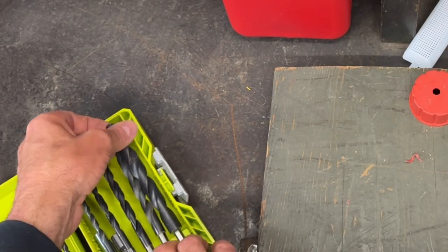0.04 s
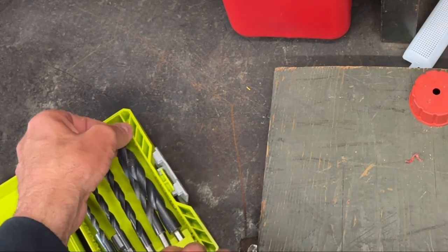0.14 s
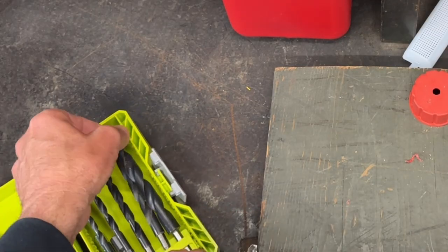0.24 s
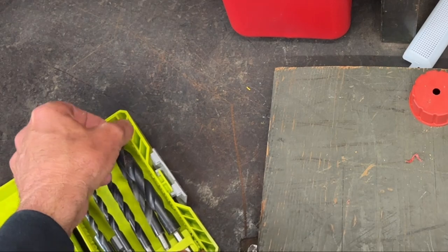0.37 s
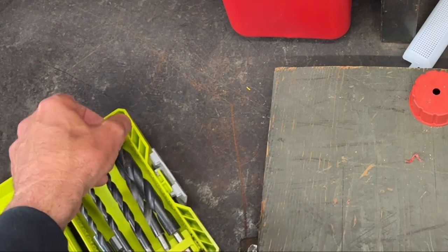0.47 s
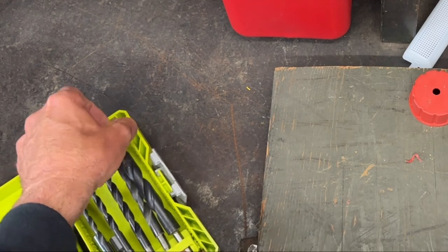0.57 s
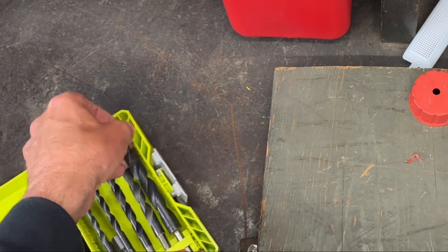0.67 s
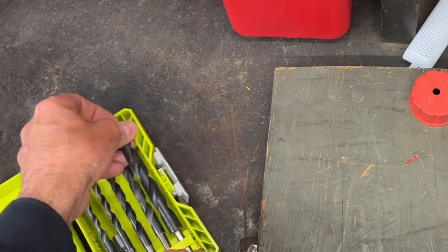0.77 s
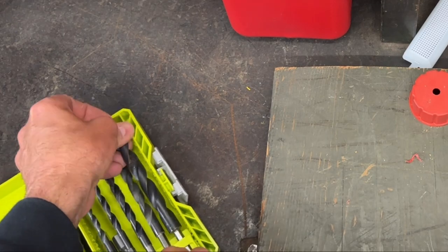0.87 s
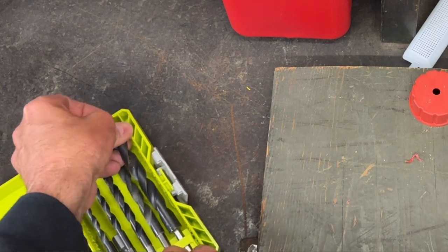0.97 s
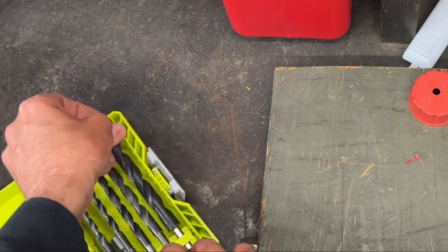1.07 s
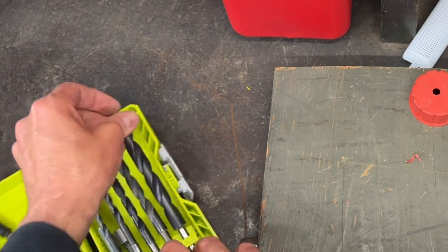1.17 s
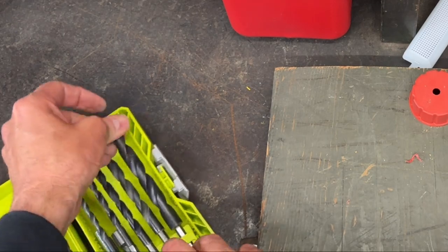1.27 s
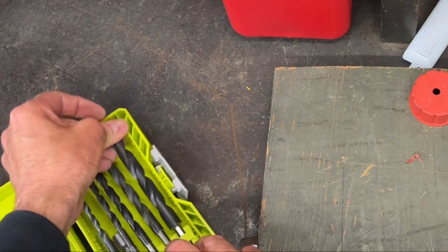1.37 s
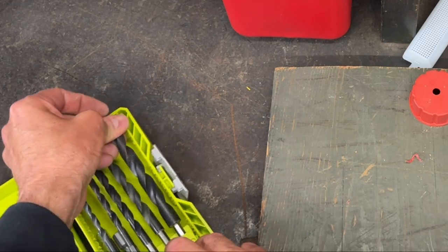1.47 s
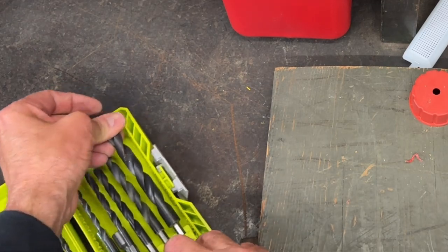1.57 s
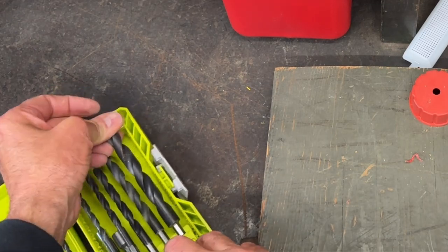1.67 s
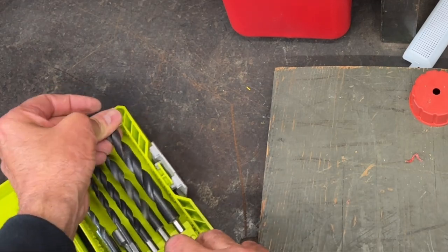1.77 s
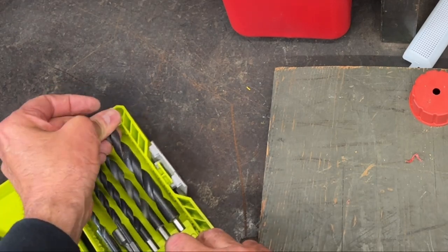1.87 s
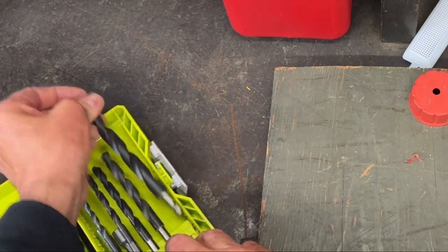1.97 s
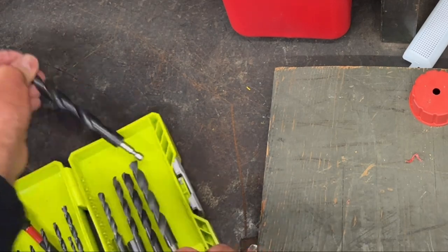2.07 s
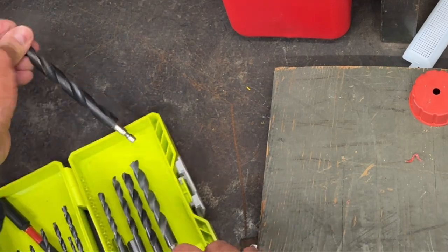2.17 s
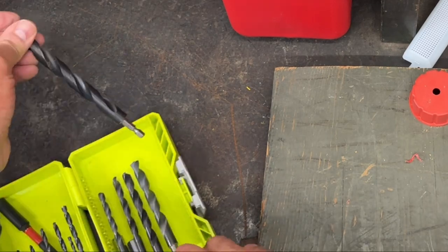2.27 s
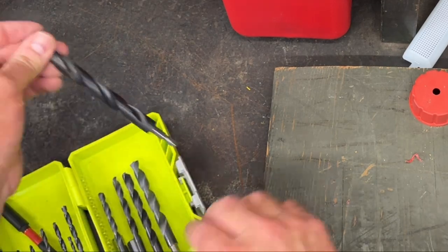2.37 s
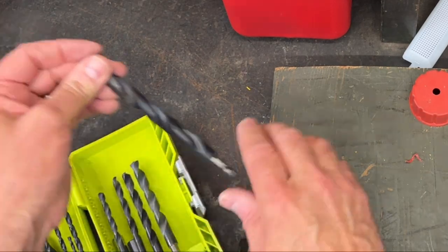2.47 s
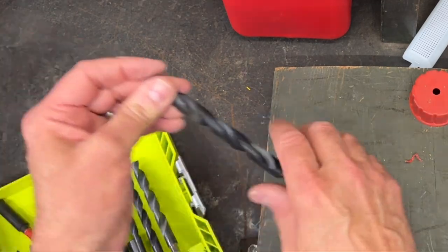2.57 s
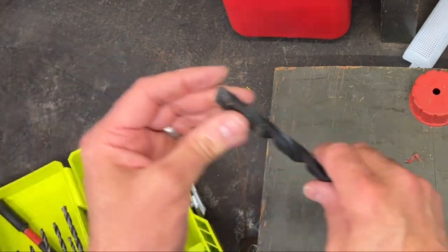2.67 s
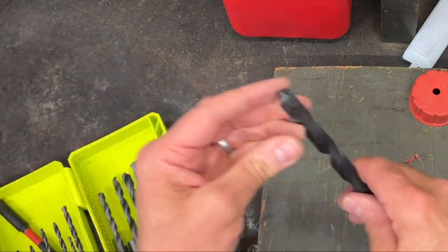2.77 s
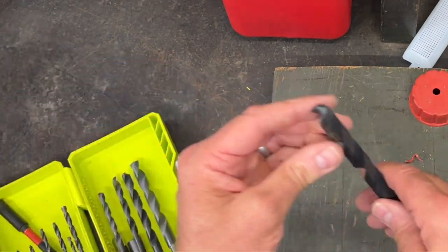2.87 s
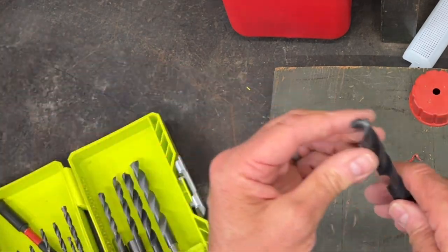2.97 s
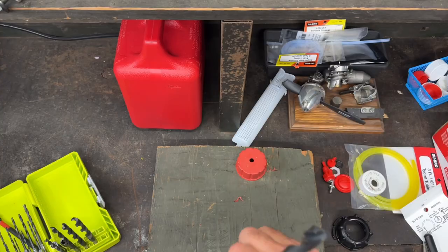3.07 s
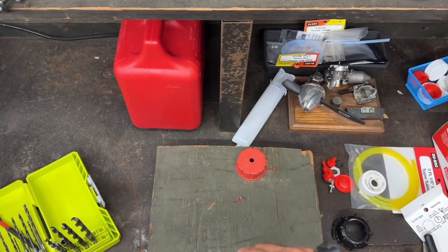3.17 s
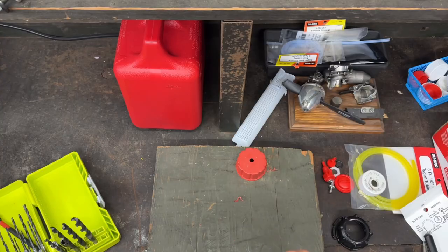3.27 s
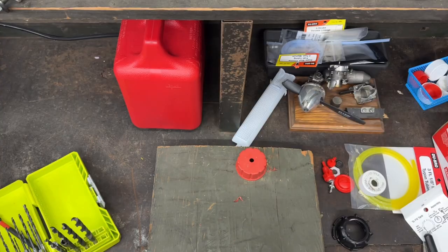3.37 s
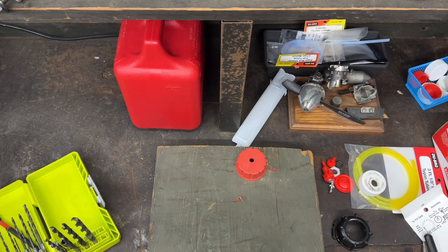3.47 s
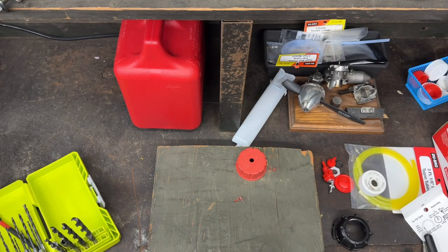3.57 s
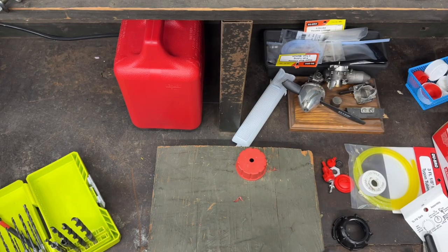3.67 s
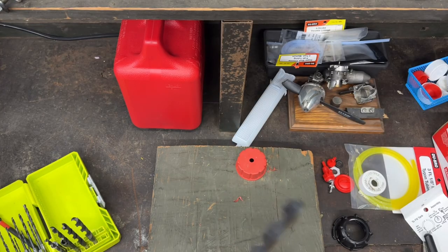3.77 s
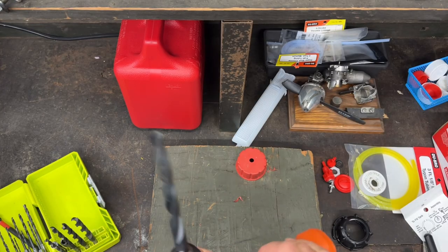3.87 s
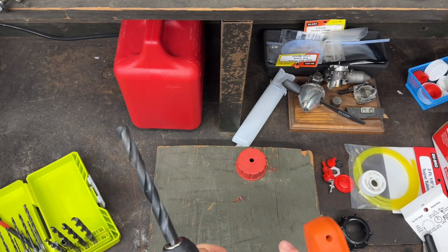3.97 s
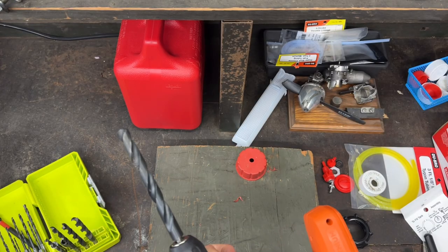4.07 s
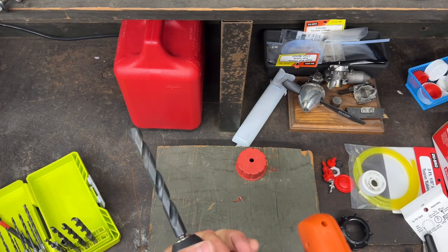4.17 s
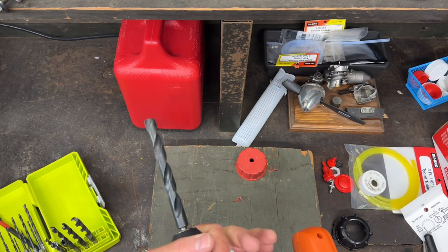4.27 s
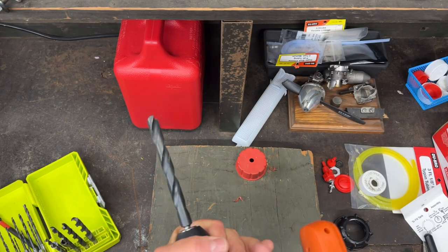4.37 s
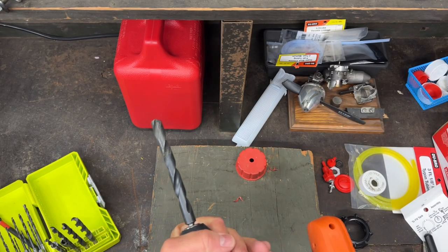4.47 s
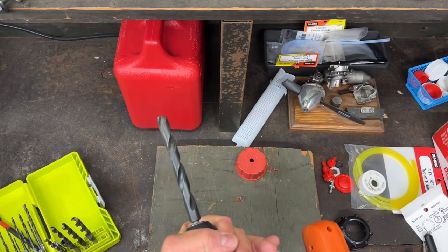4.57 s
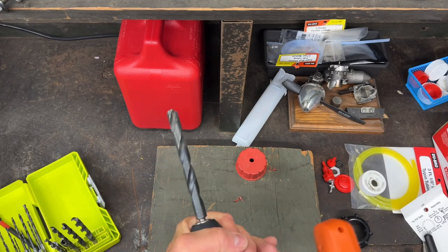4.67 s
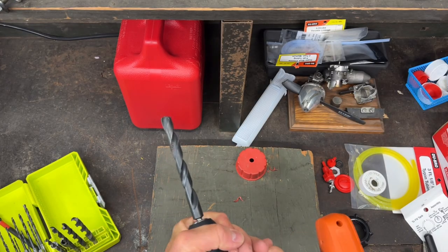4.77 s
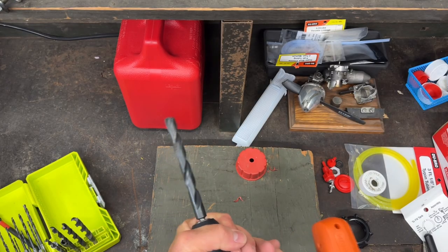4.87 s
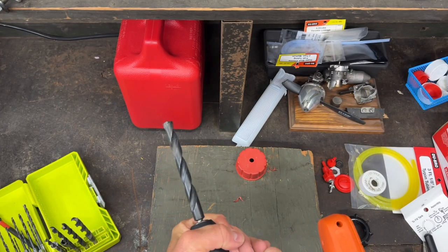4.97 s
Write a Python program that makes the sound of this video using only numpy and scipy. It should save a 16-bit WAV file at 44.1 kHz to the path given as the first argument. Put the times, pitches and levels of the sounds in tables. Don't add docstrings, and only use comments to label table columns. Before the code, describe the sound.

Skin rubs on plastic and drill bits clatter irregularly in their case, growing busier before a violent double snap releases one bit, ringing thinly. The scene cuts with a soft low bump; light handling and tiny switch clicks follow. A cordless drill then revs three times, each pull very brief, with loose gear rattle between. Close, fairly dry small-room sound with low handling rumble.

```python
import sys
import numpy as np
from scipy import signal
from scipy.fft import rfft, irfft, next_fast_len
from scipy.io import wavfile
from scipy.ndimage import uniform_filter1d

SR = 44100
rng = np.random.default_rng(int(sys.argv[2]) if len(sys.argv) > 2 else 0)


def field_ratio(decibels):
    return 10 ** (np.asarray(decibels, dtype=float) / 20)


def dump_mix(stems):
    frames = np.atleast_2d(stems).T
    limited = np.clip(frames, -1, 1)
    pcm = np.round(limited * 32767).astype(np.int16)
    wavfile.write(sys.argv[1], SR, pcm)


N = 221911
TIME = np.arange(N) / SR
CHANGE_S = 3.0435

# centre_hz, width_hz, level_db
CASE_MODES = [(428, 12, -2.5), (720, 470, 0.5), (976, 110, -8), (1160, 210, 4.5), (1380, 56, -5),
              (1950, 130, 3), (2050, 20, -4), (2260, 25, -8), (2820, 38, -11.5), (3750, 120, -6.5),
              (4446, 360, -2.5), (4860, 380, -11)]


def evened(x):
    return x / np.sqrt(np.mean(x ** 2) + 1e-20)


def read(points, hz):
    f, value = np.transpose(points)
    return np.interp(np.log(hz + 1), np.log(f + 1), value)


def colour(x, points):
    size = next_fast_len(len(x))
    gain = field_ratio(read(points, np.fft.rfftfreq(size, 1 / SR)))
    return evened(irfft(rfft(x, size) * gain, size)[:len(x)])


def band(x, lo_hz, hi_hz, order=2):
    sos = signal.butter(order, [lo_hz, min(hi_hz, 20000)], "band", fs=SR, output="sos")
    return signal.sosfilt(sos, x)


def resonate(x, hz, width_hz):
    r = np.exp(-np.pi * width_hz / SR)
    feedback = [1, -2 * r * np.cos(2 * np.pi * hz / SR), r * r]
    return signal.lfilter([(1 - r * r) / 2, 0, (r * r - 1) / 2], feedback, x)


def body(x, modes):
    return sum(field_ratio(db) * resonate(x, hz, width_hz) for hz, width_hz, db in modes)


def wander(smooth):
    return evened(uniform_filter1d(rng.standard_normal(N), smooth))


def grit(spread_db, smooth):
    return rng.standard_normal(N) * field_ratio(spread_db * wander(smooth))


def add(mix, start_s, sound):
    part = mix[round(start_s * SR):][:len(sound)]
    part += sound[:len(part)]


def background():
    # pitch_hz, level_db (per Hz)
    hush_tones = [
        [(59, -19), (100, 4.5), (279, -9), (330, -15.5), (427, -11), (540, -35.5), (920, -20.5), (1140, -23.5), (10900, -37), (15100, -37.5), (16400, -51)],
        [(59, -60.5), (100, -2.5), (345, -30.5), (776, -39), (920, -26.5), (1540, -34), (2850, -34), (4100, -43), (4660, -38), (14100, -46.5), (16400, -44.5)],
    ]
    # time_s, level_db
    hand_curve = [(0, -71), (.28, -67.5), (.5, -73.5), (.99, -67), (1.36, -64.5), (1.74, -66.5),
                  (1.93, -68), (1.942, -44.5), (2.08, -45), (2.13, -59.5), (2.52, -74.5), (3.04, -75),
                  (3.2, -87), (3.6, -80.5), (3.99, -79.5), (4.29, -79), (4.6, -74.5), (5.03, -79)]
    before = field_ratio(-64.5) * colour(rng.standard_normal(N), hush_tones[0])
    after = field_ratio(-74.5) * colour(rng.standard_normal(N), hush_tones[1])
    sway = colour(rng.standard_normal(N), [(1, -14.5), (4, 5.0), (8, -5.0), (25, -15.0), (40, -42.5), (200, -84.5)])
    rumble = colour(rng.standard_normal(N), [(15, -44.0), (30, 2.5), (80, -2), (130, -28.5),
                                             (300, -38.5), (1000, -91)])
    scrape = evened(band(grit(1.8, 300), 100, 480))
    hand_db = np.interp(TIME, *np.transpose(hand_curve))
    calmer_db = -6.5 * (TIME > CHANGE_S)
    drift_db = 2 * wander(6000)
    sway_db = -37.5 + 0.19 * (hand_db + 62) + calmer_db + drift_db
    rumble_db = -52 + 0.61 * (hand_db + 70) + calmer_db
    hand = field_ratio(sway_db) * sway + field_ratio(rumble_db) * rumble + field_ratio(hand_db) * scrape
    return np.where(TIME < CHANGE_S, before, after) + hand


def room(x):
    # pitch_hz, t60_s
    decay = [(200, 0.31), (1000, 0.19), (4000, 0.16), (12000, 0.1)]
    taps = np.zeros(SR // 2)
    at = np.arange(200, len(taps) - 20, 20)
    taps[at + rng.integers(0, 20, len(at))] = rng.choice([-1., 1.], len(at))
    hz, t, z = signal.stft(taps, SR, nperseg=256)
    fade = field_ratio(-60 * t / read(decay, hz)[:, None])
    tail = signal.istft(z * fade, SR, nperseg=256)[1]
    return signal.fftconvolve(x, tail / np.linalg.norm(tail))[:N]


def rubbing():
    # start_s, length_s, rub_db, hiss_db
    strokes = [(0, 0.017, -61, -59), (0.041, 0.075, -75, -73.5), (0.39, 0.11, -73, -86),
               (0.522, 0.16, -66.5, -76.5), (0.677, 0.11, -69.5, -80), (0.787, 0.18, -75.5, -79),
               (0.949, 0.17, -64, -72.5), (1.108, 0.14, -55, -64), (1.243, 0.052, -60.5, -68),
               (1.333, 0.07, -65, -75), (1.407, 0.043, -62, -67.5), (1.486, 0.13, -72, -82),
               (1.69, 0.14, -67, -78.5), (1.83, 0.13, -75.5, -78), (1.93, 0.028, -46.5, -53),
               (1.969, 0.082, -39, -50.5), (2.05, 0.18, -60, -72.5), (2.267, 0.065, -69, -64.5),
               (3.07, 0.17, -82, -98.5), (3.269, 0.07, -73, -79.5), (3.412, 0.01, -67.5, -94.5),
               (3.46, 0.14, -81, -83), (3.592, 0.066, -64, -76), (3.745, 0.081, -77, -79.5),
               (3.885, 0.043, -71.5, -86), (3.908, 0.03, -82, -77), (3.939, 0.084, -65.5, -67),
               (4.06, 0.12, -69.5, -69.5), (4.173, 0.27, -69.5, -76.5)]
    # pitch_hz, level_db
    rub_tone = [(290, -40.5), (500, -7), (1300, -0.5), (1570, 4), (2070, -4), (3440, -7), (7640, -38),
                (14700, -26), (16000, -41.5)]
    grains = grit(1.0, 60)
    mid = evened(band(colour(grains, rub_tone), 300, 2400))
    mid = evened(mid + .5 * evened(body(mid, CASE_MODES)))
    hiss = colour(grains, [(1500, -26.0), (3500, 4.5), (7000, -6.5), (12000, -13), (15500, -16), (17000, -30)])
    out = np.zeros(N)
    for start_s, length_s, rub_db, hiss_db in strokes:
        at = slice(round(start_s * SR), round((start_s + 1.207 * length_s) * SR))
        stroke = field_ratio(rub_db) * mid[at] + field_ratio(hiss_db) * hiss[at]
        weakening = field_ratio(np.linspace(4, -7, len(stroke)))
        add(out, start_s, stroke * signal.windows.tukey(len(stroke), .7) * weakening)
    return out


def knock(peak_db, ring_hz, thud_db, tick_db, t60_s):
    n = 4500
    t = np.arange(n) / SR
    bounce, rough = rng.random(n), rng.standard_normal(n)
    blows = (bounce < 400 / SR) * np.sign(rough) + .07 * rough
    blows[0] = 1.1

    def fade(share):
        return field_ratio(-60 * t / (share * np.clip(t60_s, .01, .3)))

    push = np.exp(-(np.arange(-20, 21) / np.clip(-tick_db / 9, 1, 8)) ** 2)
    soft = signal.oaconvolve(blows * fade(0.86), push)[:n]
    slope_db = .3 * (tick_db + 13.5)
    spot_db = 3 * rng.standard_normal(len(CASE_MODES))
    modes = [(hz, width_hz, db + extra_db + slope_db * np.log2(hz / 1000))
             for (hz, width_hz, db), extra_db in zip(CASE_MODES, spot_db)]
    ring = .75 * evened(resonate(resonate(soft, ring_hz, 350), ring_hz, 350))
    ring += evened(body(soft, modes))
    ring += field_ratio(slope_db - 4) * evened(band(soft, 1300, 4000))
    thud = band(blows * fade(1.5), 100, 480, order=3)
    boom = band(blows * fade(1.7), 51, 230)
    tick = band((blows + 0.34 * rough) * fade(.7), 1500, 9500)
    tick = evened(tick) + .7 * evened(body(tick, modes))
    layers = ((0, ring), (thud_db, thud), (thud_db - 3.5, boom), (tick_db + 0.5, tick))
    return field_ratio(peak_db) * sum(field_ratio(db) * x / abs(x).max() for db, x in layers)


def knocks():
    # start_s, peak_db, ring_hz, thud_db, tick_db
    case_knocks = [(0.001, -41.5, 770, -2.5, -25), (0.17, -47.5, 1040, 4, -15), (0.212, -50, 1030, -5, -14),
                   (0.254, -46, 1000, -20, -20), (0.2618, -23, 1076, -27.5, -23.5),
                   (0.43, -52, 1950, -21, -38), (0.614, -37, 820, 2, -49), (0.665, -41.5, 950, -16, -34),
                   (0.806, -50, 2220, -28, -4), (0.841, -42, 1030, -10.5, -26), (1.069, -41, 980, -36, -34),
                   (1.133, -43, 1640, -11, -16), (1.172, -31, 1240, -6.5, -36), (1.213, -22, 977, -39, -45),
                   (1.224, -31, 1150, -7.5, -19), (1.254, -33, 1700, -7.5, -9),
                   (1.3154, -23, 970, -13.5, -23.5), (1.321, -25.5, 740, -22, -67),
                   (1.362, -41.5, 950, 1.5, -28), (1.387, -40, 960, -2, -60), (1.524, -50.5, 915, -30, -31),
                   (1.943, -30, 330.7, -4.5, -40)]
    # start_s, peak_db, ring_hz, tick_db, t60_s
    snaps = [
        (1.942, -27.5, 1224, -21.5, 0.093),
        (1.966, -11.5, 1455, -20.5, 0.1),
        (1.989, -17, 806, -17, 0.16),
        (2.019, -7, 660, -35, 0.051),
        (2.027, -22.5, 869, -12.5, .03),
        (2.064, -12, 751, -9, .06),
        (2.0676, -9.5, 1900, -17.5, .045),
        (2.278, -53, 1252, -21, 0.099),
        (2.309, -49, 830, -10, 0.064),
    ]
    # start_s, peak_db, ring_hz, tick_db
    taps = [(2.75, -44.5, 934, -54.5), (3.0748, -45, 1286, -40), (3.097, -49.5, 647, -46),
            (3.286, -58, 1528, -23.5), (3.404, -46.5, 884, -33), (3.419, -62, 881, -41),
            (3.588, -50.5, 1057, -32), (3.664, -57, 1196, -53.5), (3.681, -59, 1070, -44),
            (3.851, -58, 1150, -31), (3.878, -57, 900, -22), (3.98, -42.5, 1070, -17.5),
            (3.995, -56, 2880, -14.5), (4.028, -46, 380, -36), (4.09, -46, 1108, -37),
            (4.198, -52, 1070, -39.5), (4.218, -54, 1160, -24), (4.244, -46, 1100, -22.5),
            (4.268, -43.5, 1620, -20), (4.287, -57, 2700, -26.5), (4.315, -44.5, 1380, -35),
            (3.509, -60, 1100, -33), (4.17, -68.5, 1040, -29)]
    out = np.zeros(N)
    for start_s, peak_db, ring_hz, thud_db, tick_db in case_knocks:
        add(out, start_s, knock(peak_db, ring_hz, thud_db, tick_db, t60_s=0.057))
    for start_s, peak_db, ring_hz, tick_db, t60_s in snaps:
        add(out, start_s, knock(peak_db, ring_hz, -15.5, tick_db, t60_s))
    for start_s, peak_db, ring_hz, tick_db in taps:
        add(out, start_s, knock(peak_db, ring_hz, -46, tick_db, t60_s=0.026))
    return out


def switch_clicks():
    # start_s, peak_db
    clicks = [(3.7044, -77), (3.8894, -81), (3.9205, -59), (3.9489, -60), (4.3344, -63)]
    out = np.zeros(N)
    fade = field_ratio(-60 * np.arange(900) / SR / 0.00894)
    for start_s, peak_db in clicks:
        burst = rng.standard_normal(900) * fade
        add(out, start_s, field_ratio(peak_db + 11.5) * band(burst, 12400, 21000, order=3))
    return out


def freed_bit():
    mode_hz = [2280, 4230, 7635, 9030, 11690, 12660, 14000]
    # level_db, t60_s
    mode_decay = [(-8, .2), (-14, .1), (0, .2), (-11, .18), (-9, .16), (-12, .05), (-8, .11)]
    out, t = np.zeros(N), np.arange(9000) / SR
    for hz, (db, t60_s) in zip(mode_hz, mode_decay):
        shiver = field_ratio(3 * evened(uniform_filter1d(rng.standard_normal(len(t)), 200)))
        pair = np.sin(2 * np.pi * hz * t) + .5 * np.sin(2 * np.pi * (hz + hz / 180) * t)
        strike = 1 + 17 * np.exp(-t / .009)
        add(out, 2.0635, field_ratio(-49 + db - 60 * t / t60_s) * strike * shiver * pair)
    return out


def motor():
    # pull_s, release_s, mesh_hz (top), droop_hz (by release), level_db
    bursts = [
        (4.336, 4.461, 1709, 160, -27.5),
        (4.651, 4.763, 1510, 40, -27),
        (4.882, 4.986, 1488, 15, -26),
    ]
    spin_up_s, brake_s, stop_s = .0145, .05, 0.043
    which = np.maximum(np.searchsorted([row[0] for row in bursts], TIME) - 1, 0)
    pull, release, top_hz, droop_hz, level_db = np.array(bursts)[which].T
    held = np.clip((TIME - pull) / (release - pull), 0, 1)
    after = np.maximum(TIME - release, 0)
    rise = 1 - np.exp(-np.maximum(TIME - pull, 0) / spin_up_s) + 1e-6
    mesh_hz = (top_hz * rise - droop_hz * held ** 3.2) * np.exp(-after / brake_s)

    def follow(db, octave_db, held_db, stop_db, steep):
        loss_db = stop_db * (after / stop_s) ** steep
        return field_ratio(level_db + db + octave_db * np.log2(rise) + held_db * held - loss_db)

    return mesh_hz, follow


def rocking():
    # centre_s, peak_db, half_width_s
    swings = [(4.512, -68, 0.01), (4.546, -41, 0.013), (4.606, -53.5, 0.023), (4.849, -45, 0.024),
              (4.88, -50.5, 0.014)]
    return sum(field_ratio(db - 3.5 * ((TIME - s) / width_s) ** 2) for s, db, width_s in swings)


def drill():
    # multiple (of the shaft speed), level_db
    shaft_lines = [(7.25, -18), (10, -15.5), (11, -20), (12, -17.5), (13, -20), (14, -13.5), (15, -3.5),
                   (16, -18), (17, -14), (20, -17.5), (29, -15), (30, -19), (35, -31), (39, -25), (44, -14),
                   (45, -27), (52, -20.5), (60, -18.5)]
    # centre_hz, width_hz, level_db
    housing = [(660, 110, -2.5), (1070, 23, 9.5), (1262, 175, 11), (1483, 97, 9), (1763, 62, 5.5),
               (2865, 260, 0.5), (3450, 220, 4.5), (3665, 52, 6.5), (4220, 180, -21), (5350, 494, -41)]
    # pitch_hz, level_db
    rattle_tone = [(120, -65), (200, 1), (867, -33), (1560, -13), (2090, -7.5), (3560, -17), (4120, -9),
                   (4520, -5), (10100, -52), (16000, -33)]
    pinion_teeth = 15
    mesh_hz, follow = motor()
    turns = np.cumsum(mesh_hz * (1 + .006 * wander(150))) / SR / pinion_teeth
    throb = 1 + .14 * np.cos(2 * np.pi * turns)

    whine = np.zeros(N)
    for multiple, db in shaft_lines:
        flutter = wander(250)
        phase = 2 * np.pi * (multiple * turns + rng.random()) + multiple * flutter / 80
        whine += field_ratio(db + 2.2 * flutter) * np.cos(phase)
    whine = 0.69 * whine + 0.46 * body(whine, housing) + 0.58 * resonate(whine, 1455, 160)

    teeth = grit(1.16, 40) * (1 + .5 * np.cos(2 * np.pi * pinion_teeth * turns)) * throb
    shell = evened(body(teeth, housing)) + 0.47 * colour(teeth, rattle_tone)
    ring = evened(band(shell, 550, 1900, order=3))
    rattle = evened(band(shell, 2930, 14300))
    shake = evened(band(teeth, 180, 420))
    slack = 0.78 * ring + 0.53 * evened(resonate(teeth, 1310, 94))
    slack += 0.17 * evened(resonate(teeth, 3480, 200))

    out = follow(-3, 17.5, 3.5, 39, 1.5) * throb * whine
    out += follow(-5, 6.5, 1, 14, 4.5) * ring
    out += follow(-32, 3, 0.5, 11, 1) * shake
    out += follow(-7, 10.5, 1.5, 24.5, 1.5) * rattle
    return out + rocking() * (slack + field_ratio(-17) * band(rattle, 2500, 6000))


def scene():
    hits = knocks() + switch_clicks() + freed_bit()
    return (background() + field_ratio(-14) * room(hits) + rubbing() + hits + drill())[None]


def band_limit(x):
    return signal.sosfilt(signal.butter(12, 16570, fs=SR, output="sos"), x)


def record(dry):
    treble = signal.sosfiltfilt(signal.butter(12, 15700, "high", fs=SR, output="sos"), dry)
    leak_s = .013
    step = .03 * (TIME > CHANGE_S) * np.exp(-np.maximum(TIME - CHANGE_S, 0) / leak_s)
    return band_limit(dry - .93 * treble + step)


dry = scene()
out = record(dry)
dump_mix(out)
```